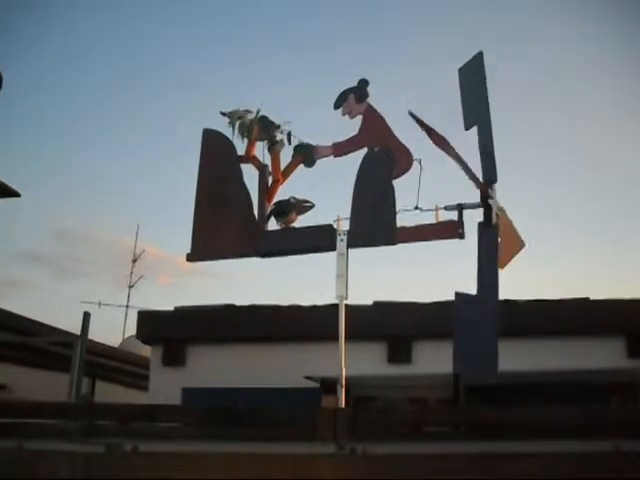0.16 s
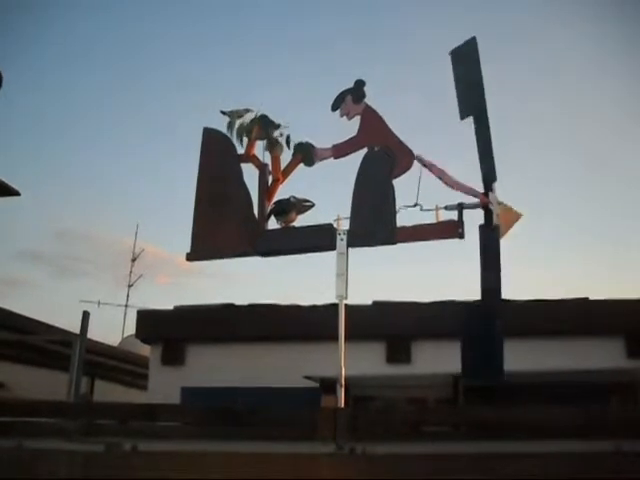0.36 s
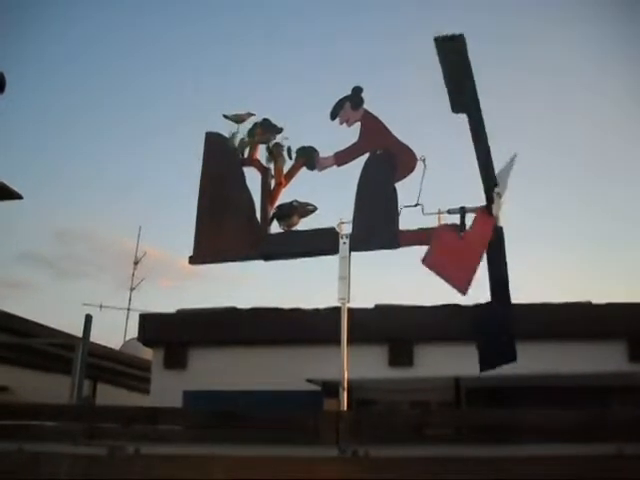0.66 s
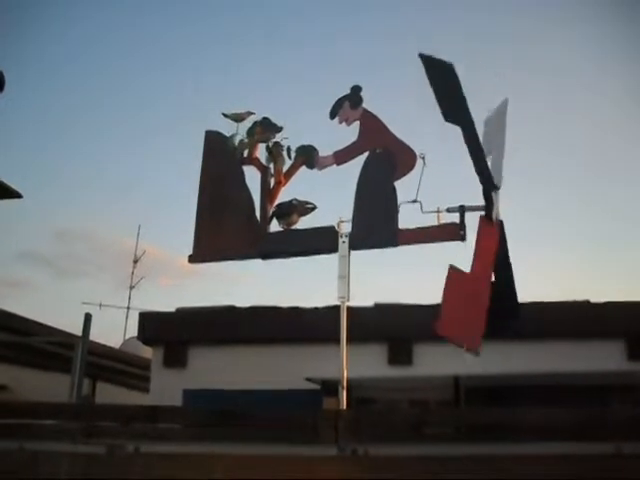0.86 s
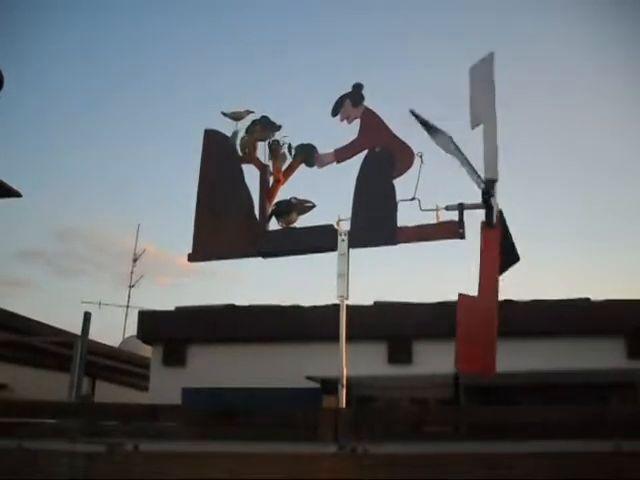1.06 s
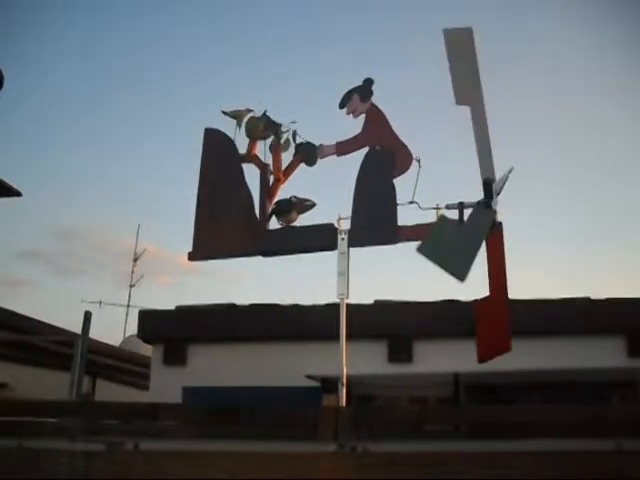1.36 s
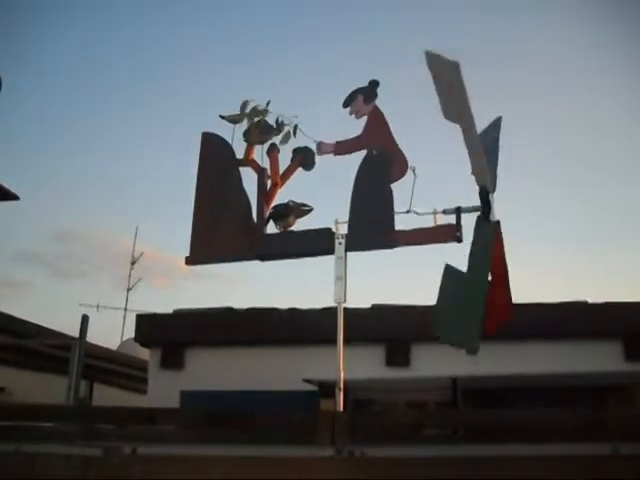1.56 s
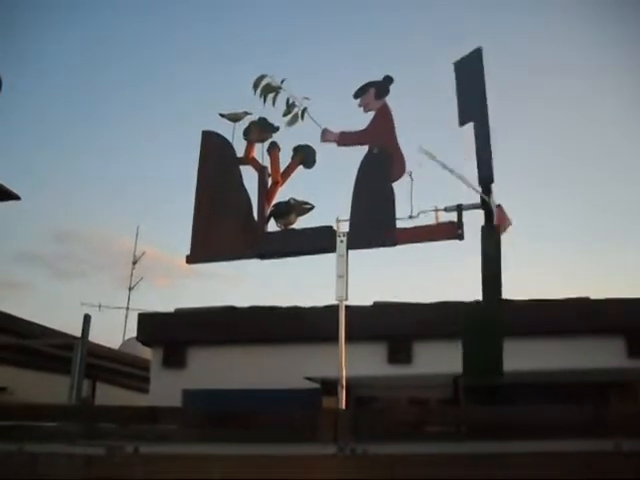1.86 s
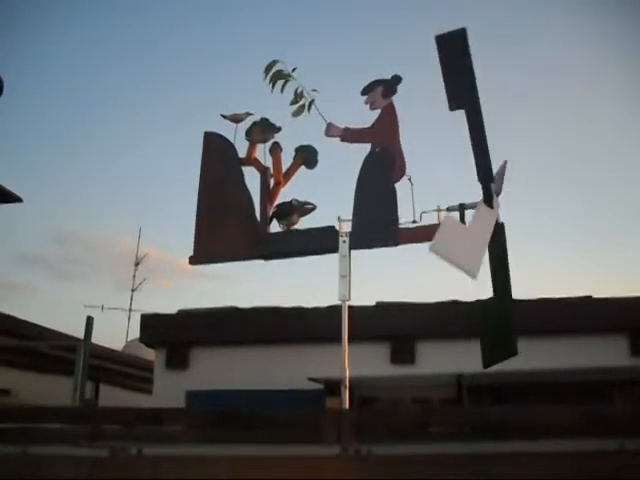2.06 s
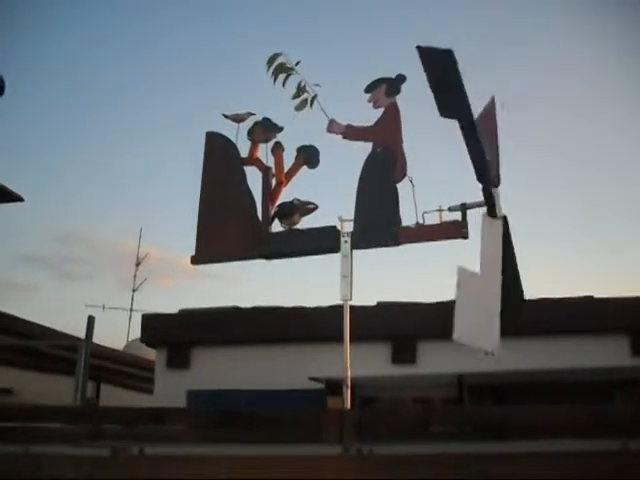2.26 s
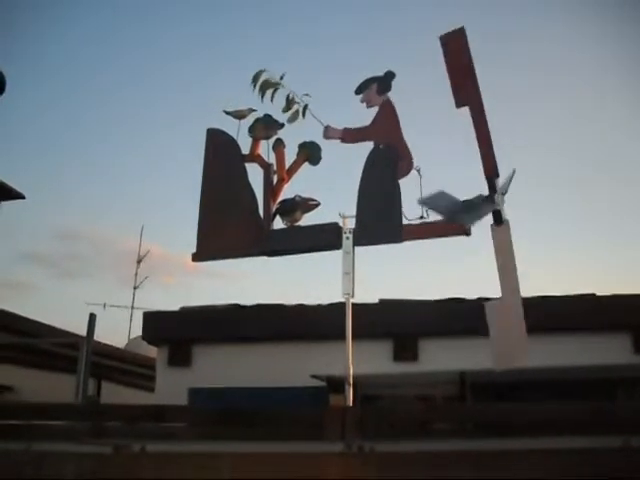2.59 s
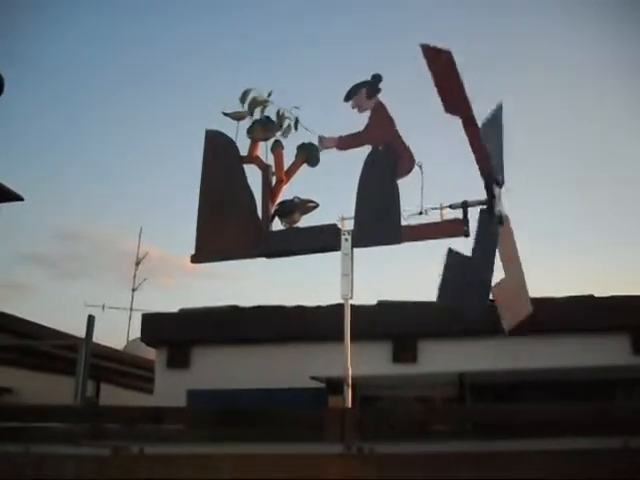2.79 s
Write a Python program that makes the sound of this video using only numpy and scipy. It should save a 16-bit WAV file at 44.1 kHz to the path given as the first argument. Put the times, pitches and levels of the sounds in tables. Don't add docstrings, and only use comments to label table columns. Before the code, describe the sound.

Low uneven wind thumps and flutter outdoors, with far road hum, hiss and tiny ticks

```python
import sys
import numpy as np
from scipy import signal
from scipy.fft import rfft, irfft, next_fast_len
from scipy.io import wavfile
from scipy.ndimage import uniform_filter1d, map_coordinates

SR = 44100
rng = np.random.default_rng(int(sys.argv[2]) if len(sys.argv) > 2 else 0)


def store_pcm(level_fs):
    pcm = np.round(np.clip(level_fs, -1, 1) * 32767).astype(np.int16)
    wavfile.write(sys.argv[1], SR, np.atleast_2d(pcm).T)


def makeup_ratio(level_db):
    decades = np.asarray(level_db, float) / 20
    return 10 ** decades


N = 129213

# t/s, strength level/dB, passing time of its small eddies/ms
WIND = [(0, -34.5, 1.8), (.1, -42, 2.5), (.33, -41.5, 1.54), (.5, -42, 2.6), (.7, -44, 2.9),
        (.85, -53.5, 1.6), (1.02, -48.5, 3.7), (1.25, -41.5, 4.3), (1.32, -48, 2.2), (1.47, -42.5, 1.9),
        (1.65, -43, 2.57), (1.93, -59.5, 3.07), (2.04, -47.5, 2.6), (2.17, -54, 5.4), (2.26, -48, 1.9),
        (2.37, -56.5, 2.8), (2.58, -43, 2.55), (2.93, -51.5, 3.8)]


def unit(x):
    return x / np.sqrt(np.mean(x ** 2) + 1e-20)


def curve(rows, t_s, column=1):
    return np.interp(t_s, np.array(rows)[:, 0], np.array(rows)[:, column])


def wobble(rate_hz):
    return map_coordinates(rng.standard_normal(400), [np.arange(N) * rate_hz / SR])


def filtered(x, response):
    m = next_fast_len(N + SR // 2)
    return irfft(rfft(x, m) * response(np.fft.rfftfreq(m, 1 / SR)), m)[..., :N]


def rush(spectrum, patchy_db):
    z = signal.stft(rng.standard_normal(N), nperseg=512)[2]
    field = uniform_filter1d(rng.standard_normal(z.shape), 6, 0)
    field = uniform_filter1d(field, 10, 1)
    x = signal.istft(z * makeup_ratio(patchy_db * unit(field)), nperseg=512)[1][:N]
    f_hz, db = np.transpose(spectrum)
    log_f = np.log(f_hz)
    return unit(filtered(x, lambda hz: makeup_ratio(np.interp(np.log(hz + 1), log_f, db, -120, -120))))


def hiss():
    # f/Hz, level/dB per Hz
    hiss_spectrum = [(300, -8), (2000, -1), (3200, 1), (5000, -0.5), (9800, -2.5), (10600, -6),
                     (11050, -17)]
    return makeup_ratio(-72) * rush(hiss_spectrum, patchy_db=1.0)


def traffic():
    # t/s, level/dB
    roar = [
        (0.03, -62),
        (0.07, -64),
        (0.94, -63),
        (0.97, -61.5),
        (1.36, -63),
        (2.89, -62),
        (2.93, -61.5),
    ]
    # f/Hz, level/dB per Hz
    road = [(100, -29), (250, 2.5), (500, -2.5), (700, -1), (1200, -2), (2000, -8), (2800, -17.5),
            (5000, -31)]
    db = curve(roar, np.arange(N) / SR) + 1.39 + 1.4 * wobble(4.55)
    return makeup_ratio(db) * rush(road, patchy_db=0.4)


def sweep(t, nearest_s):
    rise_s, fall_s = 0.087, 0.13
    return np.exp(-((t - nearest_s) / np.where(t < nearest_s, rise_s, fall_s)) ** 2)


def blade_swish(t):
    # f/Hz, level/dB per Hz
    blade_spectrum = [(700, -24), (1300, -4.5), (2000, -0.5), (3000, -4.5), (4000, -7.5), (6000, -14.5),
                      (9000, -47)]
    # f/Hz, level/dB per Hz
    edge_spectrum = [(1500, -23), (3000, -2), (4800, 1), (5800, -12), (8000, -28)]
    nearest_s, swish_db = 1.052, -65.5
    edge_leads_s, edge_db = 0.04, -10
    blade = makeup_ratio(swish_db) * sweep(t, nearest_s) * rush(blade_spectrum, patchy_db=0.0)
    edge = makeup_ratio(swish_db + edge_db) * sweep(t, nearest_s - edge_leads_s) * rush(edge_spectrum, patchy_db=8.0)
    return blade + edge


def axle_squeak(t):
    at_s, squeak_db, squeak_hz, lasts_s = 1.675, -69.5, 8170, 0.0053
    return makeup_ratio(squeak_db) * np.exp(-((t - at_s) / lasts_s) ** 2) * np.sin(2 * np.pi * squeak_hz * t)


def linkage_ticks():
    # t/s, peak level/dB, brightness/dB per octave
    ticks = [
        (1.4168, -56.5, -2.5),
        (2.367, -57.5, -9),
    ]
    # f/Hz, level/dB, t60/s
    wire = [(2950, -1, .015), (3500, -4, .025), (4830, 3, .012), (5500, 2, .01), (6600, -1, .008),
            (7400, 1, .012), (8100, 1, .012)]
    out = np.zeros(N)
    u = np.arange(SR // 10) / SR
    for at_s, peak_db, bright_db in ticks:
        tick = np.zeros(len(u))
        for hz, mode_db, t60_s in wire:
            tilt_db = bright_db * np.log2(hz / 3500)
            decay_db = mode_db + tilt_db + rng.normal(0, 1) - 60 * u / t60_s
            tick += makeup_ratio(decay_db) * np.sin(2 * np.pi * hz * u)
        tick += 0.59 * makeup_ratio(bright_db - 60 * u / 0.006) * rng.standard_normal(len(u))
        out[round(at_s * SR):][:len(u)] += makeup_ratio(peak_db - 6.0) * tick
    return out


def whirligig():
    t = np.arange(N) / SR
    return blade_swish(t) + axle_squeak(t) + linkage_ticks()


def wind_swing_db():
    db = curve(WIND, np.arange(N) / SR)
    return db - db.mean()


def flutter():
    # f/Hz, level/dB per Hz
    flutter_spectrum = [(25, -14.5), (55, 1), (100, -1.5), (160, -8.5), (250, -20), (400, -29), (600, -43)]
    return makeup_ratio(-54 + 0.35 * wind_swing_db()) * rush(flutter_spectrum, patchy_db=1.8)


def swell():
    # f/Hz, level/dB per Hz
    swell_spectrum = [(8, -34), (20, 3), (35, 0), (60, -4), (120, -16), (250, -29), (450, -46.5),
                      (800, -89)]
    db = -50.5 + 0.43 * wind_swing_db() + 1.5 * wobble(16)
    return makeup_ratio(db) * rush(swell_spectrum, patchy_db=1.0)


def thumps(t_s, gain, pass_ms, lean):
    span = np.arange(-SR // 30, SR // 30)
    u = span / SR * 1000 / pass_ms[:, None]
    shape = gain[:, None] * (u + lean[:, None] * (1 - u * u)) * np.exp(-u * u / 2)
    at = np.round(t_s * SR).astype(int)[:, None] + span + SR
    return np.bincount(at.ravel(), shape.ravel(), N + 2 * SR)[SR:SR + N]


def small_eddies():
    count, size_spread, scatter_db = 400, 0.35, 3
    draw = rng.standard_normal((count, 3))
    t_s = (np.arange(count) + rng.random(count)) * N / SR / count
    db = curve(WIND, t_s) - 9 + scatter_db * draw[:, 1]
    pass_ms = curve(WIND, t_s, column=2) * np.exp(size_spread * draw[:, 0])
    return thumps(t_s, makeup_ratio(db), np.clip(pass_ms, 1.3, 8), 0.86 + draw[:, 2])


def large_eddies():
    # t/s, pressure level/dB, passing time/ms
    pushes = [(.006, -32.5, 4), (0.0103, -43.5, 1.36), (.018, -49, 1.06), (0.032, -41, 6.5),
              (0.0727, -42, 1.75), (0.1564, -39, 1.78), (0.166, -42, 0.99), (0.184, -38, 5.4),
              (0.332, -45, 1.12), (0.308, -49, 2.6), (0.345, -38, 4.8), (0.4416, -36.5, 2.18),
              (0.4824, -38.5, 1.69), (0.5541, -36.5, 2.6), (0.6328, -39, 1.5), (0.6603, -40.5, 1.19),
              (0.667, -34.5, 1.8), (0.6782, -38, 1.1), (1.0184, -41, 3.06), (1.136, -39, 3.5),
              (1.2177, -38, 1.9), (1.2568, -37.5, 1.8), (1.4993, -39, 2.6), (1.5218, -35, 2.42),
              (2.0365, -43, 1.46), (2.0575, -34, 1.78), (2.0859, -36, 2.01), (2.5122, -38, 4.8),
              (2.5837, -34, 1.96), (2.7692, -42.5, 1.26), (2.825, -42.5, 1.84), (2.894, -40.5, 1.72),
              (0.05, -43.5, 5.7), (0.11, -45, 2.5), (.2, -41.5, 1.6), (0.232, -42, 3.2), (0.26, -42, 5.1),
                (.377, -41.5, 3.9), (0.409, -53, 2), (.494, -47.5, 3), (0.599, -44.5, 1.85),
                (.698, -42, 2.25), (1.04, -44, 5.8), (1.2726, -38, 4.6), (1.358, -47, 2.5),
                (1.456, -41.5, 2.6), (1.479, -40.5, 2.4), (1.5301, -41, 1.76), (1.576, -46, 2.1),
                (1.6, -46, 2.9), (1.61, -42.5, 1.74), (1.628, -48, 3.1), (1.686, -52, 2.2),
                (1.7692, -42, 3), (2.018, -46, 4.4), (2.213, -48, 3.7), (2.251, -52, 1.53),
                (2.437, -46, 5.2), (2.545, -42.5, 3), (2.608, -39.5, 4.4), (2.626, -46.5, 3.9),
                (2.706, -45.5, 2.9)]
    # t/s, pressure level/dB, passing time/ms
    sucks = [(0.025, -38, 2.36), (0.1424, -45.5, 2), (.305, -44.5, 1.8), (0.422, -50, 1.3),
             (0.5337, -43, 4.3), (0.639, -39.5, 4.5), (.73, -45, 2.5), (1.032, -49.5, 1.86),
             (1.1137, -44, 2.08), (1.2446, -39.5, 2.55), (1.365, -45, 3.9), (1.385, -48, 1.7),
             (1.421, -50, 2.8), (1.5456, -42.5, 2.3), (1.632, -42, 2.9), (1.822, -61, 3.5),
             (1.845, -52, 3.5), (1.885, -55.5, 2.2), (2.293, -50.5, 3.8), (2.351, -54, 1.83),
             (2.6198, -45, 1.6), (2.734, -42.5, 2.8), (2.818, -45, 2.4), (2.884, -46.5, 6.5),
             (2.921, -45, 2)]
    lean = 2.32
    t_s, db, pass_ms = np.transpose(pushes)
    push = thumps(t_s, makeup_ratio(db), pass_ms, np.full(len(t_s), lean))
    t_s, db, pass_ms = np.transpose(sucks)
    return push - thumps(t_s, makeup_ratio(db), pass_ms, np.full(len(t_s), lean))


def wind():
    return flutter() + swell() + small_eddies() + large_eddies()


def scene():
    far = filtered(traffic() + whirligig(), lambda hz: hz < 11080)
    return (far + wind())[None]


def roll_off(x):
    return signal.sosfilt(signal.butter(12, 11100, fs=SR, output="sos"), x)


def record(dry):
    converter_noise = makeup_ratio(-90) * rng.standard_normal(N)
    return roll_off(dry + hiss() + converter_noise)


dry = scene()
out = record(dry)
store_pcm(out)
```